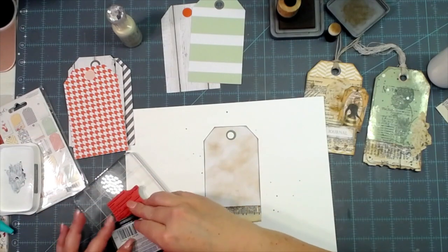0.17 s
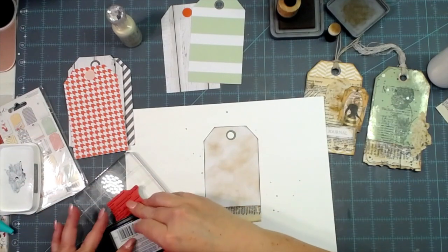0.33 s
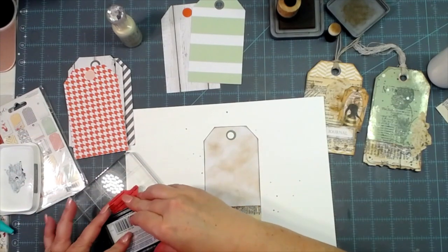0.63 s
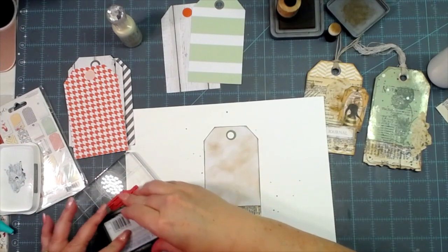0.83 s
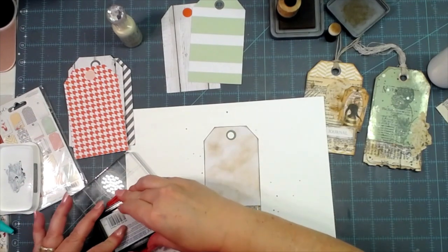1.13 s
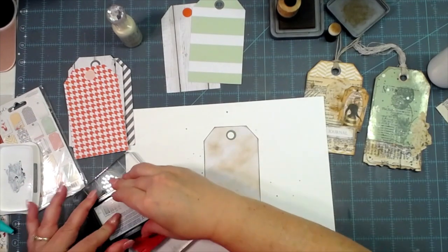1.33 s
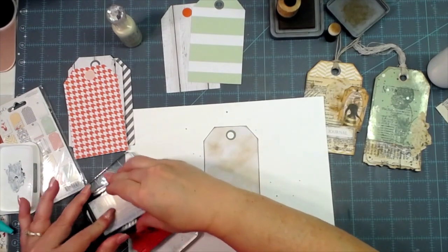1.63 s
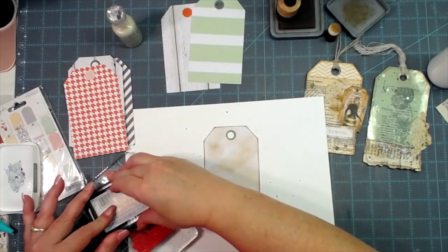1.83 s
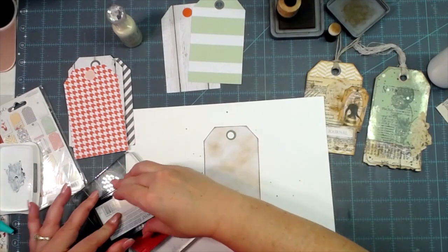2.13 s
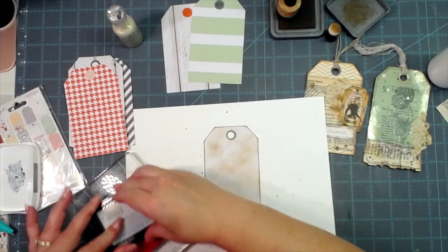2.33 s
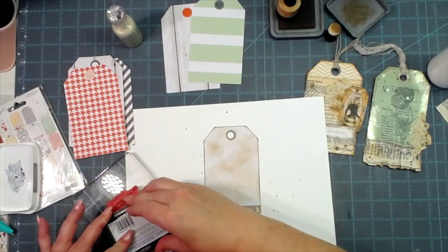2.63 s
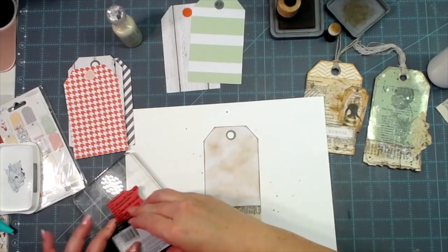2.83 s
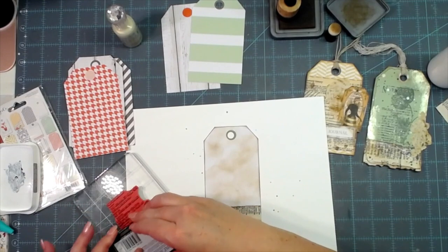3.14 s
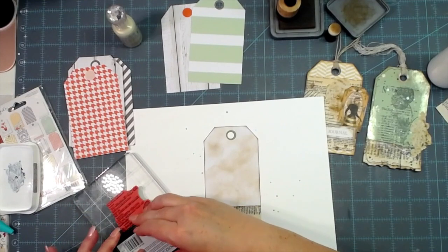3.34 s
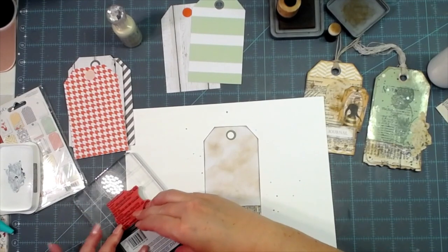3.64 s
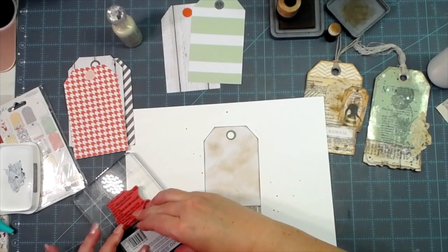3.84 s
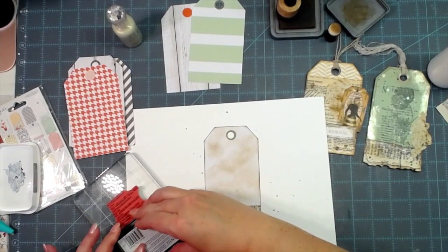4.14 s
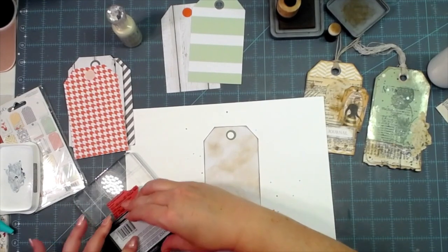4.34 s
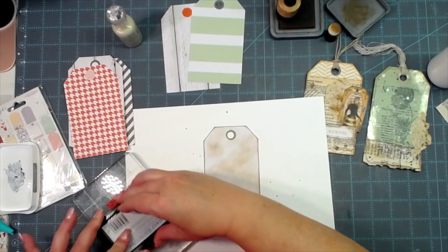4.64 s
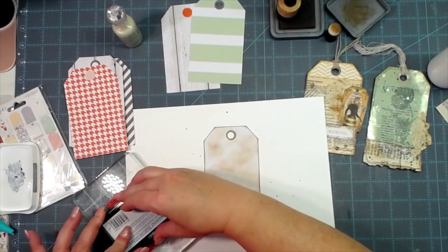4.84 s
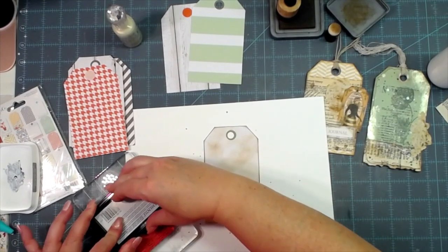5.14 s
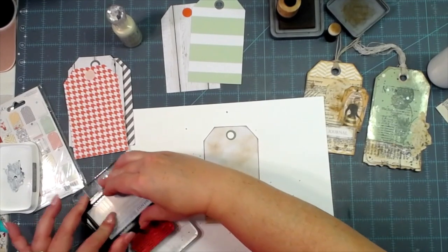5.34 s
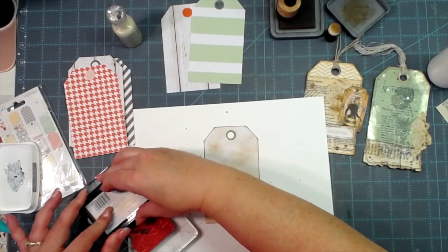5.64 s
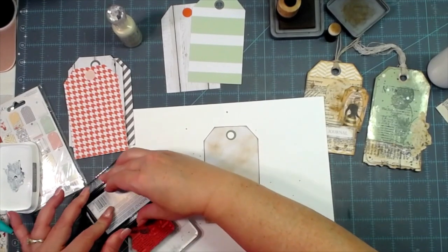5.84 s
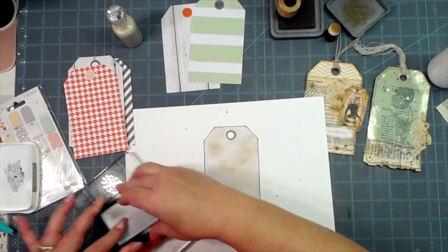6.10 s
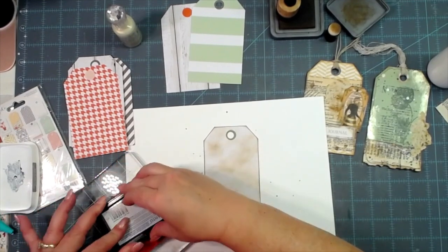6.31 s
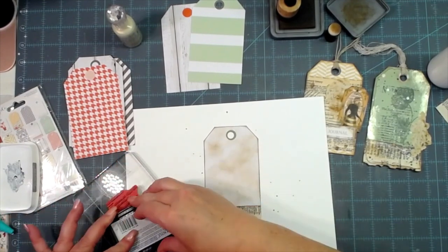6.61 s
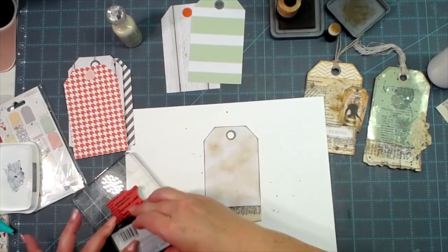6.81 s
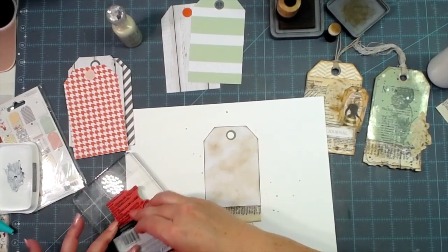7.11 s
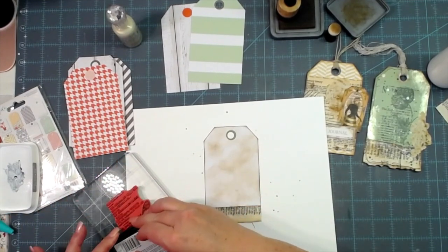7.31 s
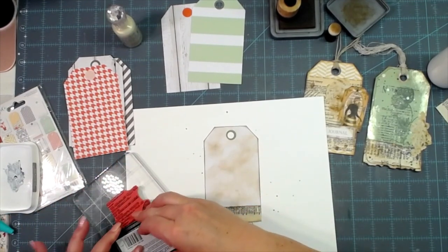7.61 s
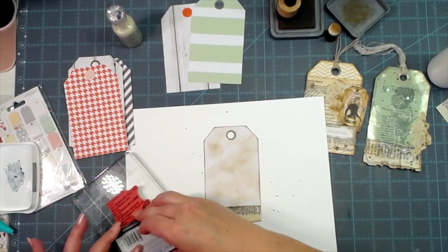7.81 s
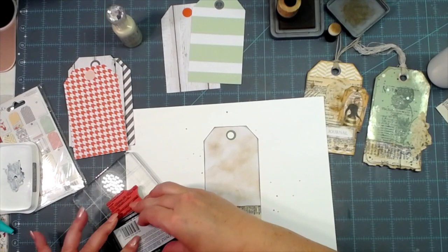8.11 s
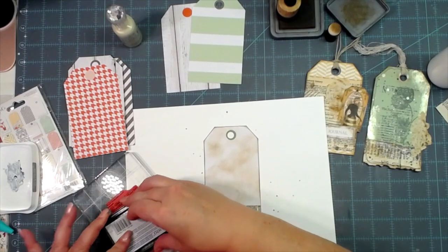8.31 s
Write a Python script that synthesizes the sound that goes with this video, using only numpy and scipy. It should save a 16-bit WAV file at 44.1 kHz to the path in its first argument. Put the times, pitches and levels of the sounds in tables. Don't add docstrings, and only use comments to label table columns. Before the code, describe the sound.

In a small, fairly dry room, an ink pad is dabbed onto a rubber stamp at a steady pace, nearly three times a second. Each soft, bassy thump shakes the desk and the microphone's springy arm, followed by light hollow plastic knocks and fine sticky ticks. A low mains hum and fan noise with faint whines continue throughout. The strongest dab comes early, with a hard clack; midway the desk briefly shudders.

```python
import sys
import numpy as np
from scipy import signal
from scipy.fft import rfft, irfft, next_fast_len
from scipy.io import wavfile
from scipy.ndimage import uniform_filter1d

SR = 44100
rng = np.random.default_rng(int(sys.argv[2]) if len(sys.argv) > 2 else 0)


def level_to_linear(level):
    exponent = np.asarray(level, float) / 20
    return 10 ** exponent


def int16_out(signal):
    q = np.round(np.clip(np.atleast_2d(signal).T, -1, 1) * 32767)
    wavfile.write(sys.argv[1], SR, q.astype(np.int16))


N = 373086

# (time [s], thump level [dB], rustle level [dB], sway level [dB])
DAB_EVENTS = [(0.541, -22.5, -39, -28), (0.9097, -18.5, -29.5, -25.5), (1.304, -21.5, -24, -26),
              (1.674, -22, -32.5, -29), (2.077, -22, -38, -31.5), (2.462, -12, -18, -23.5),
              (2.838, -28, -33, -25), (3.191, -22, -37, -29), (3.5644, -21.5, -33, -27),
              (3.9231, -23.5, -30.5, -28.5), (4.295, -19, -34, -30), (4.648, -26, -30, -28),
              (5.0269, -18.5, -28.5, -27), (5.372, -27.5, -47, -30), (5.7025, -22, -33, -27),
              (6.077, -22, -41, -30.5), (6.449, -27.5, -39, -28), (6.8068, -26, -36, -30.5),
              (7.1742, -24.5, -52, -30.5), (7.5496, -19, -28.5, -28), (7.911, -31.5, -38, -27.5),
              (8.2673, -20.5, -29.5, -25.5)]
# (upper desk modes [dB], lingering desk [dB], bracket level [dB], bracket pitch [Hz])
DAB_LANDINGS = [(0, -8, -37, 208), (0.5, -7, -36, 215), (-8, 0, -35, 220), (1, -5, -46, 195),
                (-3, -11, -46, 205), (0.5, -3, -29, 180), (-5, 3, -37, 170), (-5, -2, -41, 215),
                (-9, -9, -42, 204), (0.5, -3, -38.5, 200), (-3, -9, -38, 203), (-3, 0, -48, 240),
                (1.5, -2, -35, 196), (-4, -4, -37.5, 180), (-1, 1, -37.5, 120), (-19, 0, -42, 189),
                (-12, 3, -43, 205), (-2, 0, -51, 200), (-2, -2.5, -44, 170), (-9, -1.5, -35.5, 205),
                (3, 3, -52, 193), (2, -5, -50, 206)]
# (time [s], level [dB], hardness of the upper modes [dB], tick level [dB])
FIRST_TOUCHES = [(0.537, -36, -18, -62), (0.91, -34, -7, -57), (1.303, -28.5, -1.5, -69),
                 (1.676, -38.5, 0.5, -51), (2.078, -44, -7, -52), (2.463, -28, -4, -44),
                 (2.823, -33, -21, -66), (3.181, -36, -5, -62), (3.558, -37.5, -15, -47),
                 (3.92, -35.5, -14, -49), (4.291, -36, -14, -64), (4.649, -39.5, -10, -50),
                 (5.025, -30.5, 4.5, -57), (5.368, -45, -20, -51), (5.704, -33, -3.5, -47.5),
                 (6.074, -43, -9, -57), (6.44, -40, -3, -54), (6.802, -39, -22, -51),
                 (7.172, -42, -17, -52), (7.55, -35, 7, -60), (7.909, -37.5, -11, -51),
                 (8.267, -35, -5, -45.5)]
# (time [s], level [dB])
OUTWARD_KNOCKS = [(0.586, -44), (.953, -31.5), (1.347, -32.5), (1.716, -30.5), (2.117, -34.5),
                  (2.508, -29.5), (2.877, -31.5), (3.229, -33), (3.61, -36.5), (3.965, -31.5),
                  (4.337, -31.5), (4.697, -31), (5.071, -33), (5.415, -32.5), (5.747, -27), (6.118, -39),
                  (6.488, -31.5), (6.843, -45), (7.213, -35), (7.595, -31.5), (7.956, -33), (8.313, -29)]


def evened(x):
    return x / np.sqrt(np.mean(x ** 2) + 1e-20)


def read(points, hz):
    f, value = np.transpose(points)
    return np.interp(np.log(hz + 1), np.log(f + 1), value)


def over_time(points):
    return np.interp(np.arange(N) / SR, *np.transpose(points))


def add(mix, s, sound):
    part = mix[round(s * SR):][:len(sound)]
    part += sound[:len(part)]


def ring(modes, seconds, lead, rise, scatter_db, spread):
    t = np.arange(round(seconds * SR)) / SR
    out = np.zeros(len(t))
    sign = -1
    for hz, db, t60 in modes:
        level_luck, pitch_luck = rng.standard_normal(2)
        decay = level_to_linear(db + scatter_db * level_luck - 60 * t / t60)
        out += sign * decay * np.sin(2 * np.pi * hz * (1 + spread * pitch_luck) * t + lead)
        sign = -sign
    return out * (1 - np.exp(-t / rise))


def band(x, lo_hz, hi_hz):
    return signal.sosfilt(signal.butter(2, [lo_hz, hi_hz], "band", fs=SR, output="sos"), x)


def resonate(x, hz, width):
    return signal.lfilter(*signal.iirpeak(hz, hz / width, SR), x)


def body(x, modes):
    out = np.zeros(len(x))
    for hz, db, width in modes:
        out += level_to_linear(db) * resonate(resonate(x, hz, width), hz, 3 * width)
    return evened(out)


def drift(rate, count=20):
    t = np.arange(0, N + 256, 256) / SR
    slow = sum(np.sin(2 * np.pi * (f * t + rng.random())) / np.sqrt(f) for f in np.geomspace(.1, rate, count))
    return np.interp(np.arange(N) / SR, t, evened(slow))


def noise(shape_db, size, patchy_db):
    frames, hz = 4 * N // size + 5, np.fft.rfftfreq(size, 1 / SR)
    real, imaginary, patches = rng.standard_normal((frames, len(hz), 3)).T
    patches = uniform_filter1d(patches, size=10, axis=0)
    patches = evened(uniform_filter1d(patches, size=8, axis=1))
    level = level_to_linear(shape_db(hz)[:, None] + patchy_db * patches)
    spectra = (real + 1j * imaginary) * level
    return evened(signal.istft(spectra, nperseg=size, noverlap=3 * size // 4)[1][:N])


def hum():
    # (time [s], level [dB])
    load = [
        (0, 1),
        (1, -.3),
        (4.1, 0),
        (5.3, 1),
        (6.5, 2),
        (8.46, 1.5),
    ]
    level_db = -45.5 + over_time(load) + .6 * drift(7)
    return np.sqrt(2) * level_to_linear(level_db) * np.sin(2 * np.pi * 120.2 * np.arange(N) / SR)


def fan():
    # (frequency [Hz], spectral density [dB])
    air_shape = [(100, -21), (175, 3.5), (246, -8.5), (467, -2), (722, -6.5), (977, 0.5), (1140, -6.5),
                 (1270, -4), (1890, -12), (2560, -6.5), (4260, -15.5), (6220, -15.5), (7240, -22.5),
                 (10000, -25.5), (15800, -30)]
    # (frequency [Hz], width [Hz], level [dB])
    air_resonances = [(338, 122, 7.5), (454.2, 46, 11), (990, 57, 3.5), (1267, 180, 4), (2534, 35, 5.5),
                      (3233, 61, -13), (6390, 280, 3.5),
                      (680, 36, 3.5), (1480, 74, 2.5), (2040, 120, 3.5), (2260, 66, 4.5), (2325, 50, -7),
               (2900, 120, -5), (3050, 97, 4), (3250, 50, 1), (3710, 280, 3.5), (4250, 72, 4),
               (4320, 300, -2), (4430, 50, 5), (4750, 64, 3.5), (5020, 120, 4.5), (5200, 200, -0.5),
               (5620, 160, 4), (6000, 54, 5.5), (6260, 60, 6), (6710, 220, 5), (7100, 200, -2),
               (7300, 80, 4.5), (7360, 100, -2.5), (7930, 500, 2), (8650, 150, 2)]
    # (frequency [Hz], spectral density [dB])
    rumble_shape = [(12, -30), (22, -2), (32, 0), (55, -10), (90, -13), (170, -19), (200, -40), (400, -90)]
    # (frequency [Hz], level [dB])
    whines = [(3461, -79), (3994, -72.5), (4662, -79), (4808, -83), (5184, -83), (5717, -81), (6132, -83)]
    # (time [s], frequency [Hz])
    motor = [(0, 3985), (.8, 3997), (1.25, 3975), (1.7, 3996), (3.5, 3985), (4.1, 3992), (4.5, 4025),
             (4.9, 3998), (5.55, 3990), (5.9, 4018), (6.4, 3995), (6.9, 4020), (7.1, 3985), (7.7, 4000),
             (7.95, 4015), (8.46, 3980)]
    # (time [s], level [dB])
    whine_load = [(0, 0.5), (.9, 3), (1.25, -6), (1.6, 2.5), (2.8, 1), (3.2, -0.5), (4.1, 0), (4.5, 0),
                  (5.301, 2), (5.9, -0.5), (6.3, 1.5), (6.9, -3), (7.4, 2), (7.9, -1), (8.46, -1)]

    def air_db(hz):
        peaks = sum(db / (1 + (2 * (hz - f) / width) ** 2) for f, width, db in air_resonances)
        return read(air_shape, hz) + peaks

    air = noise(air_db, size=1024, patchy_db=.6)
    rumble = noise(lambda hz: read(rumble_shape, hz), size=4096, patchy_db=4.0)
    speed = uniform_filter1d(over_time(motor), size=4000) / whines[1][0]
    turns = np.cumsum(speed * (1 + .0014 * drift(15))) / SR
    whine = np.zeros(N)
    for hz, db in whines:
        whine += np.sqrt(2) * level_to_linear(db + 1.5 + 1.2 * drift(25)) * np.sin(2 * np.pi * hz * turns)
    return level_to_linear(-51 + 0.48 * drift(8.8)) * air + level_to_linear(-52) * rumble + level_to_linear(over_time(whine_load)) * whine


def clacks():
    # (time [s], level [dB], frequency [Hz], t60 [s])
    clack_events = [(.006, -43, 3240, 0.018), (0.802, -53.5, 4420, 0.081), (0.2, -44, 3700, .012),
                    (0.18, -47, 2500, .02), (0.214, -42.5, 2400, 0.014), (.214, -46, 3000, .012),
                    (0.73, -50, 1300, .03), (0.797, -63, 9800, 0.26), (.82, -64, 8700, 0.3),
                    (.797, -62, 12500, .04), (1.3033, -46, 2530, .015), (1.2, -40, 1400, .012),
                    (2.462, -33, 1400, .015), (8.2, -36, 1100, .01), (1.331, -44, 3400, .022),
                    (1.332, -36, 1300, 0.024), (.934, -47, 1900, .035), (.957, -40, 1520, .03),
                    (1.33, -46, 2400, .05), (1.354, -45, 1480, 0.037), (1.394, -47, 2500, 0.027),
                    (2.0327, -46, 2030, 0.015), (2.4623, -36.5, 2500, 0.021), (2.485, -39, 4100, .02),
                    (2.508, -36, 1600, 0.022), (2.497, -37, 1900, .02), (2.516, -37, 1400, 0.014),
                    (2.879, -45, 2800, .012), (3.274, -49, 4600, 0.011), (2.491, -49, 6700, 0.093),
                    (2.878, -47, 1360, 0.06), (3.273, -37, 1900, 0.023), (3.277, -49, 3500, 0.022),
                    (5.028, -30, 1160, 0.021), (5.076, -44, 2200, .015), (1.362, -46, 2500, .025),
                    (5.056, -46, 2300, .025), (5.072, -46, 2030, .03), (5.66, -47.5, 2480, 0.022),
                    (6.4467, -38, 2340, 0.012), (6.4455, -40.5, 4000, 0.0092), (6.446, -44, 13500, .005),
                    (6.807, -49, 2800, .015), (7.551, -41.5, 2400, .02), (7.58, -51, 4600, .03),
                    (7.81, -51, 2660, .02), (8.113, -51, 4500, 0.037), (8.2666, -47, 2260, 0.018)]
    out, t = np.zeros(N), np.arange(5000) / SR
    for s, db, hz, t60 in clack_events:
        spread = 1 + min(.35, hz * 1.5e-6 / t60)
        puff = evened(band(rng.standard_normal(len(t)), hz / spread, hz * spread))
        add(out, s, level_to_linear(db + 1.0 - 60 * t / t60) * puff)
    return out


def ticks():
    # (time [s], level [dB], middle band [dB])
    peels = [(.0792, -55, -4), (.737, -45.5, -1), (1.117, -45.5, 2), (1.15, -55, 3), (1.5289, -47, -2),
             (2.2872, -45, 0), (2.6339, -47, 1), (2.654, -48, 0), (3.0195, -53, 6), (3.034, -50, -13),
             (3.4151, -50, -4), (4.1305, -49, -4), (4.4917, -45, 0), (4.844, -45, 0), (4.877, -44.5, 7.5),
             (5.1861, -51, 3), (5.225, -53, 6), (5.266, -49, 6), (6.2547, -52, 1), (6.6527, -42, 1.5),
             (7.0335, -44, 3), (7.7608, -46, 1), (7.812, -49, -6), (8.1117, -42, -2), (8.445, -47, 6.5)]
    # (time [s], level [dB], middle band [dB])
    last_snaps = [(.2165, -52, 0), (.795, -48, 3), (1.3952, -54, 4), (1.484, -55, -6), (1.6257, -56, 10),
                  (1.7873, -55, 12), (2.0333, -45, 2), (3.1243, -52, 4), (3.6825, -55, -5), (5.659, -50, 6),
                  (6.3914, -49, 6), (6.447, -32, -3), (7.5512, -41, -11)]
    # (time [s], level [dB], middle band [dB])
    squelches = [(.5776, -52, 9), (.5945, -52, -4), (.9263, -50, 11), (.95, -49, 0), (.964, -49, 7),
                 (1.3316, -42, 1), (1.36, -44, -8), (2.0931, -51, 1), (2.4795, -33.5, 0),
                 (2.5165, -38, -11), (2.8605, -48, 6), (2.8893, -41, -2), (3.2395, -51, 6), (3.591, -47, 0),
                 (3.9474, -47, 2), (4.3196, -57, -2), (4.3455, -49, 0), (4.6778, -56, 0), (5.053, -46, 3),
                 (5.0833, -42.5, -2), (5.425, -55, -2), (5.7304, -46, 0), (6.103, -53, 5), (6.4971, -49, 3),
                 (7.224, -52, -6), (7.5765, -43, -1), (7.9563, -48, 5), (8.293, -47, 6), (8.324, -49, -12),
                 (8.3754, -58, -1)]
    touches = [(dab[0], touch[3], 8) for dab, touch in zip(DAB_EVENTS, FIRST_TOUCHES)]
    strays_per_s, stray_db = 14, -66
    strays = []
    for _ in range(round(strays_per_s * N / SR)):
        strays.append((rng.random() * N / SR, stray_db + 8.0 * rng.random(), 0))

    bright, middle, t = np.zeros(N), np.zeros(N), np.arange(4000) / SR
    kinds = [(touches, .022), (squelches, .03), (peels, .026), (last_snaps, .017), (strays, .017)]
    for events, t60 in kinds:
        decay = level_to_linear(-60 * t / t60) + level_to_linear(-20 - 15 * t / t60)
        shape = decay * (1 - np.exp(-t / (.35 * t60)))
        for s, db, middle_db in events:
            crackle_db = 2.0 * rng.exponential(1, len(t))
            burst = shape * evened(rng.standard_normal(len(t)) * level_to_linear(crackle_db))
            add(bright, s, level_to_linear(db) * burst)
            add(middle, s, level_to_linear(db + middle_db) * burst)
    high = level_to_linear(10.0) * band(bright, 5900, 11940)
    fizz = level_to_linear(8.0) * band(bright, 8660, 21000)
    return high + fizz + level_to_linear(14.5) * band(middle, 1800, 3660)


def dabs():
    # (time [s], thump level [dB], rustle level [dB], sway level [dB])
    faint = [
        (0.142, -51, -54, -43),
        (2.823, -37, -59, -45),
        (3.183, -29.5, -59, -42),
        (4.288, -32, -59, -37),
        (6.438, -38, -59, -45),
        (6.797, -28.5, -59, -42),
        (7.923, -40, -59, -41),
    ]
    # (frequency [Hz], level [dB], t60 [s]); neighbours swing in opposite directions
    desk_main = [(57, 3, .107), (86, 7.5, .067)]
    # (frequency [Hz], level [dB], t60 [s])
    desk_upper = [(158, -9, .1), (177, -15, .11), (190, 5, .03)]
    # (frequency [Hz], level [dB], t60 [s])
    desk_tail = [(61.6, -11, 0.41), (98.6, -6, 0.23)]
    # (frequency [Hz], level [dB], t60 [s])
    arm = [(28.6, -1.4, .63), (32.26, 3.6, .54), (33.2, -5.2, .76)]
    out = np.zeros(N)
    landings = [row[:2] for row in DAB_LANDINGS] + [(2.5, 0)] * len(faint)
    for (s, thump_db, _, sway_db), (sharp_db, linger_db) in zip(DAB_EVENTS + faint, landings):
        desk = desk_main + [(hz, db + sharp_db, t60) for hz, db, t60 in desk_upper]
        thump = ring(desk, .3, lead=.54, rise=.005, scatter_db=1, spread=.03)
        linger = ring(desk_tail, .4, lead=0, rise=.02, scatter_db=1, spread=.04)
        sway = ring(arm, .8, lead=2.17, rise=.004, scatter_db=0, spread=0)
        add(out, s, level_to_linear(thump_db - 1) * thump)
        add(out, s, level_to_linear(thump_db + linger_db) * linger)
        add(out, s, level_to_linear(sway_db + 6.3) * sway)
    return out


def pings():
    # (time [s], level [dB], frequency [Hz], t60 [s])
    edge_clicks = [(1.3305, -45, 4630, 0.056), (2.4815, -30.5, 2950, 0.018), (2.482, -39.5, 5080, .03),
                   (2.4845, -22, 1110, 0.0096), (5.0278, -30, 3000, 0.01), (5.0278, -30, 3900, 0.0096),
                   (5.0278, -33, 1600, .012), (.797, -52, 9900, .03), (8.2668, -43, 3500, .008),
                   (.2155, -45, 3300, .008)]
    # (frequency ratio, level [dB])
    squeak_parts = [(1, -53.5), (.64, -59)]
    out = np.zeros(N)
    for s, db, hz, t60 in edge_clicks:
        add(out, s, ring([(hz, db, t60)], .08, lead=0, rise=0.00037, scatter_db=0.5, spread=0))
    squeak_s, length_s, squeak_hz, arch_hz = .794, .08, 1520, 100
    arch = np.sin(np.pi * np.sqrt(np.arange(0, 1, 1 / (SR * length_s))))
    turns = np.cumsum(squeak_hz + arch_hz * arch) / SR
    squeak = sum(level_to_linear(db) * np.sin(2 * np.pi * ratio * turns) for ratio, db in squeak_parts)
    add(out, squeak_s, np.sqrt(arch) * squeak)
    return out


def case_strikes():
    # (level [dB], level [dB], level [dB])
    strike_levels = [(-55, -51, -57), (-50, -31, -49), (-38, -31, -30.5), (-43, -35, -43), (-58, -45, -52),
                     (-47, -49, -37), (-39, -37, -46), (-39, -43, -42), (-52, -43, -50), (-52, -48, -52),
                     (-52, -40, -49), (-55, -49, -50), (-42, -20.5, -33), (-57, -51, -50),
                     (-43, -27.5, -48), (-58, -49, -55), (-47, -36, -44), (-43, -49, -56), (-50, -48, -45),
                     (-26.5, -33, -34), (-46, -35, -53), (-43, -40, -51)]
    # (frequency [Hz], t60 [s])
    case_modes = [(263, 0.056), (331, 0.06), (420, 0.048)]
    out = np.zeros(N)
    for dab, levels in zip(DAB_EVENTS, strike_levels):
        modes = [(hz, db, t60) for (hz, t60), db in zip(case_modes, levels)]
        add(out, dab[0] - .0005, ring(modes, .12, lead=0, rise=.002, scatter_db=0, spread=.02))
    return out


def chatter():
    # (frequency [Hz], level [dB], width [Hz])
    soft_case = [(142.4, 3.5, 51), (199, 0.5, 17.5), (269, -6, 39)]
    # (frequency [Hz], level [dB], width [Hz])
    hard_case = [(320, 11.5, 56), (365, 5, 23), (424, 5, 11)]
    # (frequency [Hz], spectral density [dB])
    rustle_shape = [(300, -24), (600, 4), (1000, 5.5), (1800, -4), (3000, -7.5), (5000, -13.5),
                    (8000, -13.5), (12000, -17.5), (15500, -30)]
    case, rustle, t = np.zeros(N), np.zeros(N), np.arange(9000) / SR
    for (touch_s, db, hard_db, _), (_, _, rustle_db, _) in zip(FIRST_TOUCHES, DAB_EVENTS):
        s = touch_s + .003
        shake = rng.standard_normal((3, len(t)))
        bumps = level_to_linear(2.5 * evened(uniform_filter1d(shake[0], size=200)))
        jolts = (1 + 2.0 * np.exp(-t / 0.00046)) * bumps * shake[1]
        add(case, s, level_to_linear(db) * body(jolts * level_to_linear(-60 * t / 0.3), soft_case))
        add(case, s, level_to_linear(db + hard_db - 8.5) * body(jolts * level_to_linear(-60 * t / 0.13), hard_case))
        swell = t / 0.033
        add(rustle, s, level_to_linear(rustle_db - 60 * t / 0.16) * swell * bumps ** 1.8 * shake[2])
    size = next_fast_len(N)
    colour = level_to_linear(read(rustle_shape, np.fft.rfftfreq(size, 1 / SR)))
    return level_to_linear(-8.5) * case + level_to_linear(-3.5) * irfft(rfft(rustle, size) * colour, size)[:N]


def bracket():
    out = np.zeros(N)
    lag_s, t60, again_db = 0.01802, 0.2, -1
    ratio, partner_db = 1.1, -8
    for dab, knock, (_, _, db, hz) in zip(DAB_EVENTS, OUTWARD_KNOCKS, DAB_LANDINGS):
        pair = [(hz, db, t60), (ratio * hz, db + partner_db, t60)]
        add(out, dab[0] + lag_s, ring(pair, .25, lead=0, rise=.008, scatter_db=0, spread=0))
        again = ring(pair, .25, lead=0, rise=.004, scatter_db=1, spread=.02)
        add(out, knock[0], level_to_linear(again_db) * again)
    return out


def rattles():
    # (time [s], level [dB])
    jump_knocks = [(.567, -38.5), (.937, -41), (.964, -35), (.993, -38), (1.336, -42), (1.36, -45),
                   (1.371, -42), (1.323, -38), (2.462, -36), (2.484, -31), (2.566, -42), (2.864, -33),
                   (3.592, -36), (3.948, -38), (4.677, -53), (5.027, -44), (5.056, -36), (5.112, -38),
                   (5.124, -47), (5.735, -42), (6.47, -50), (7.57, -40), (7.583, -40), (8.296, -36)]
    # (time [s], level [dB])
    back_knocks = [(.605, -38.5), (.982, -30.5), (1.38, -34), (1.744, -36), (2.14, -38), (2.546, -36.5),
                   (2.912, -38), (3.258, -34), (3.638, -33), (3.994, -34), (4.366, -33), (4.724, -34.5),
                   (5.104, -37), (5.442, -35), (5.777, -34.5), (6.14, -44), (6.515, -32.5), (6.869, -38),
                   (7.239, -34), (7.623, -35.5), (7.983, -33.5), (8.342, -34)]
    # (frequency [Hz], level [dB], t60 [s])
    loose_modes = [(734.6, 3, .06), (1600, 3.5, 0.013), (2410, 1.5, 0.0063), (1003, -4.5, 0.026),
                   (1260, -11, 0.0066)]
    low_hz, low_db, _ = loose_modes[0]
    twin_ratio, twin_db, twin_share = 1.11, -6, .7
    out = np.zeros(N)
    for knocks, usual_db in ((OUTWARD_KNOCKS, -3.5), (back_knocks, -4.5), (jump_knocks, -18)):
        for s, db in knocks:
            force_db = np.clip(db + 31.5, -9, 9)
            t60 = 0.038 * np.exp(-0.0033 * force_db)
            upper_db = usual_db - 0.74 * force_db
            modes = [(low_hz, low_db, t60), (low_hz * twin_ratio, low_db + twin_db, t60 * twin_share)]
            modes += [(hz, own_db + upper_db, fade) for hz, own_db, fade in loose_modes[1:]]
            knock = ring(modes, .1, lead=0, rise=.0014, scatter_db=.7, spread=.025)
            rebound = ring(modes, .1, lead=0, rise=.002, scatter_db=1, spread=.03)
            add(out, s, level_to_linear(db + 1) * knock)
            add(out, s + rng.uniform(.005, .011), level_to_linear(db - 7) * rebound)
    return out


def drone():
    # (time [s], level [dB])
    swell = [
        (0, -95),
        (4.2, -76),
        (4.6, -53.5),
        (5.3, -53),
        (6, -56),
        (6.6, -54),
        (7.6, -59),
        (8.46, -53),
    ]
    rush = rng.standard_normal(N)
    low = band(band(rush, 128.4, 173), 128.4, 173)
    upper = band(band(rush, 214, 338), 214, 338)
    return level_to_linear(over_time(swell)) * (evened(low) + level_to_linear(-9) * evened(upper))


def shudder():
    # (time [s], level [dB], frequency [Hz])
    slips = [
        (4.462, -31, 99),
        (4.679, -36, 120),
        (4.697, -32, 112),
        (4.72, -38, 126),
    ]
    # (frequency ratio, level [dB], t60 [s])
    partners = [(1.54, -5, 0.076), (0.57, 0, 0.13)]
    out = np.zeros(N)
    for s, db, hz in slips:
        modes = [(hz, 0, 0.18)] + [(hz * ratio, own_db, t60) for ratio, own_db, t60 in partners]
        add(out, s, level_to_linear(db) * ring(modes, .2, lead=np.pi, rise=0.0039, scatter_db=1, spread=.02))
    drag_s, length_s, drag_hz, drag_db = 4.4646, .28, 104, -34.5
    t = np.arange(0, length_s, 1 / SR)
    judder = np.sin(2 * np.pi * drag_hz * t)
    for ratio, _, _ in partners:
        judder += level_to_linear(-11) * np.sin(2 * np.pi * ratio * drag_hz * t)
    add(out, drag_s, level_to_linear(drag_db) * np.sin(np.pi * t / length_s) * judder)
    return out


def room(x, t60=0.12):
    at = np.arange(200, SR // 2, 20)
    taps = np.zeros(SR // 2 + 20)
    signs = rng.choice([-1., 1.], len(at))
    taps[at + rng.integers(0, 20, len(at))] = signs * level_to_linear(-60 * at / SR / t60)
    return signal.oaconvolve(x, taps / np.linalg.norm(taps))[:N]


def scene():
    clicks = clacks() + ticks() + bracket() + rattles()
    airborne = clicks + level_to_linear(-15.0) * room(clicks)
    background = hum() + fan() + drone()
    contacts = dabs() + pings() + case_strikes() + chatter() + shudder()
    return (background + airborne + contacts)[None]


def roll_off(x):
    return signal.sosfilt(signal.butter(12, 16510, fs=SR, output="sos"), x)


def record(dry):
    low_pass = signal.firwin(2047, 15800, window=("kaiser", 9), fs=SR)
    limited = signal.oaconvolve(dry, low_pass[None], "same")
    return roll_off(limited)


dry = scene()
out = record(dry)
int16_out(out)
```